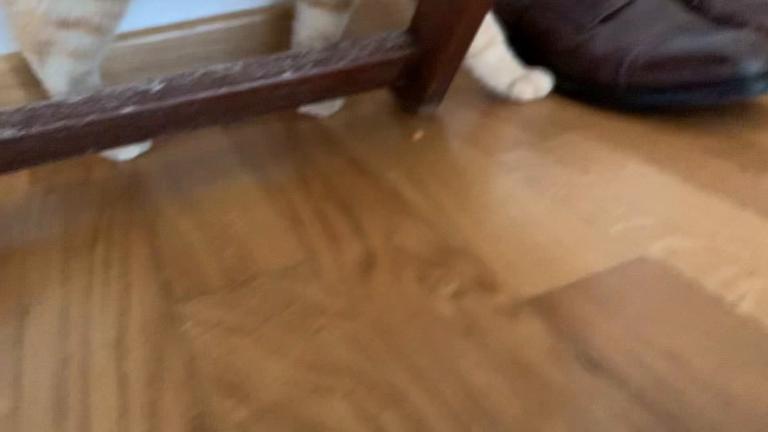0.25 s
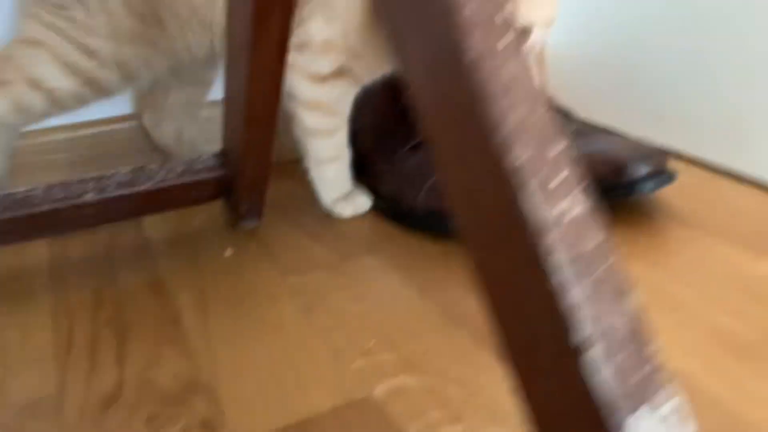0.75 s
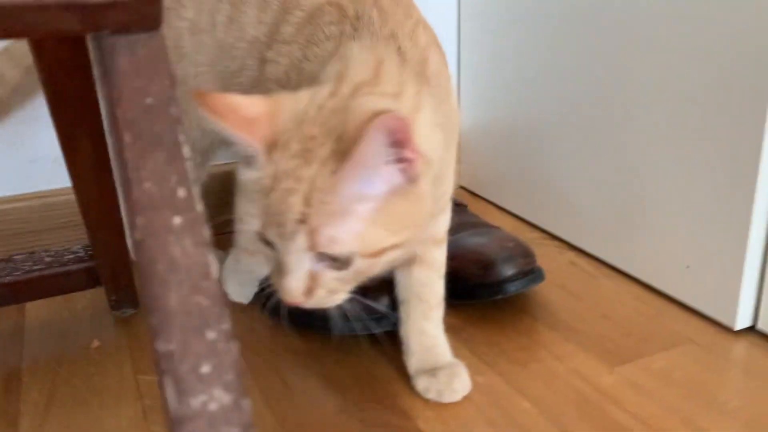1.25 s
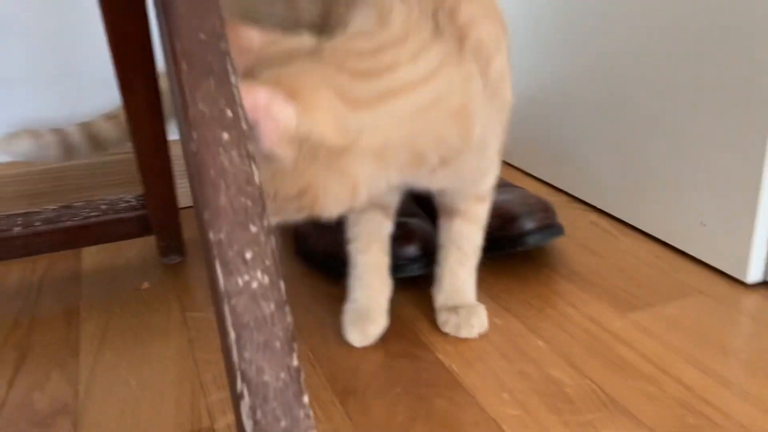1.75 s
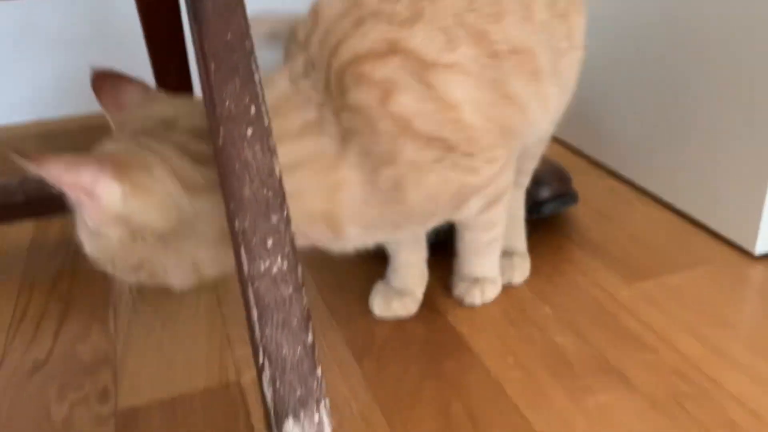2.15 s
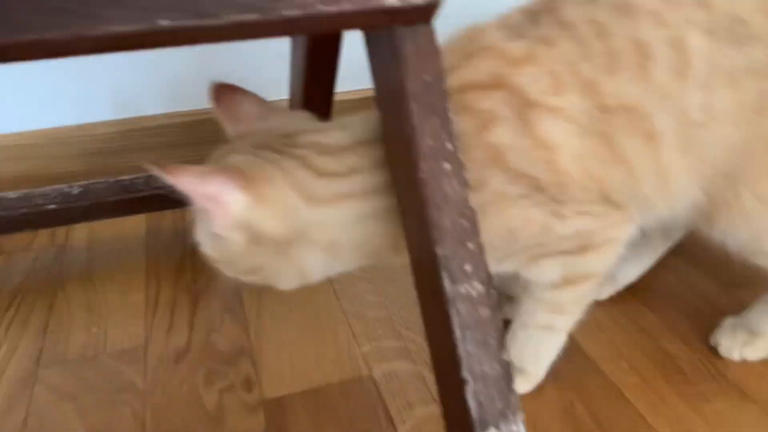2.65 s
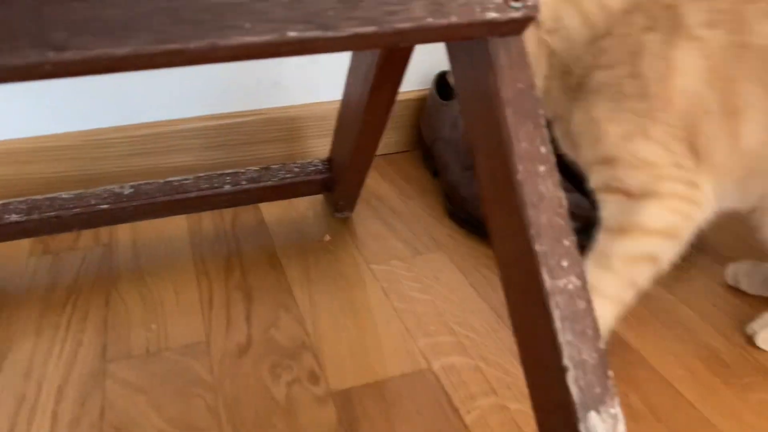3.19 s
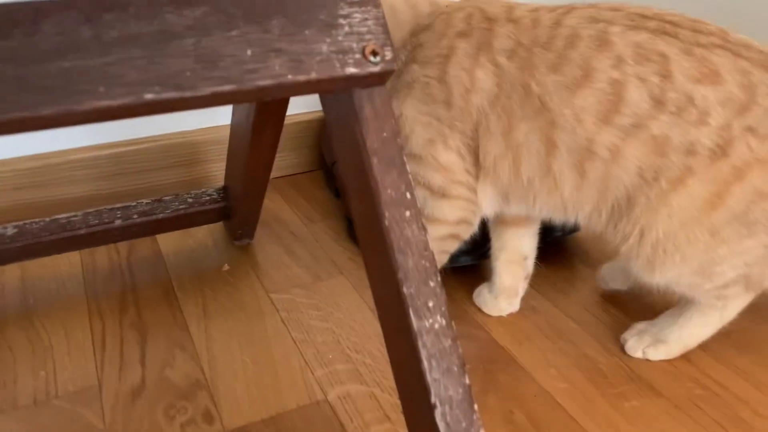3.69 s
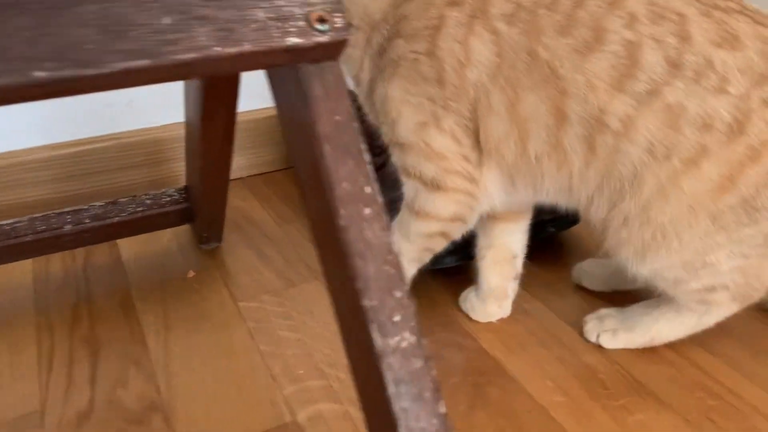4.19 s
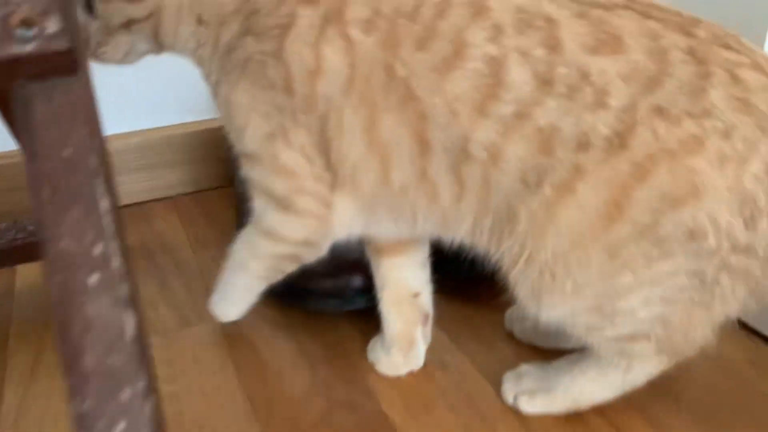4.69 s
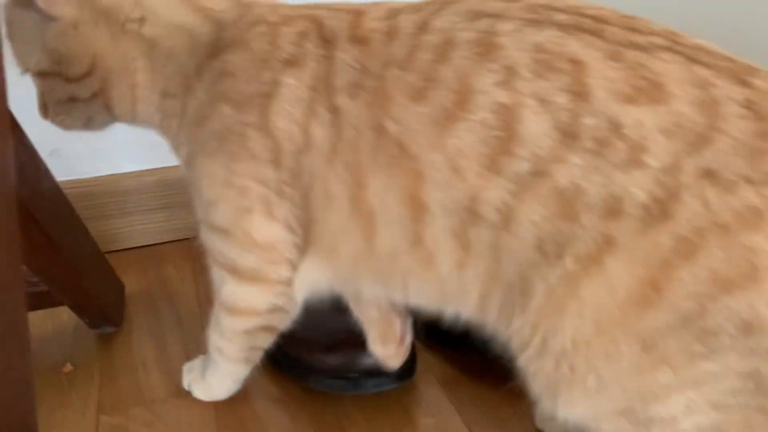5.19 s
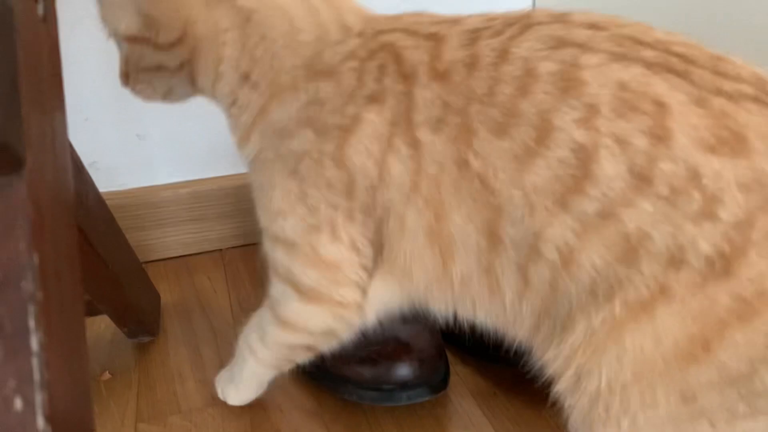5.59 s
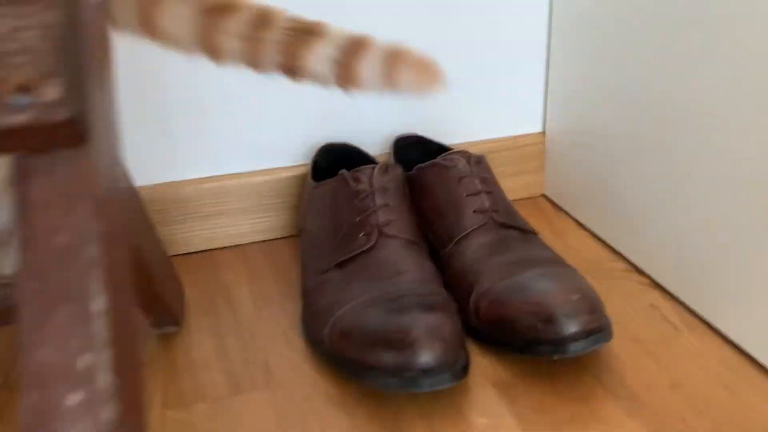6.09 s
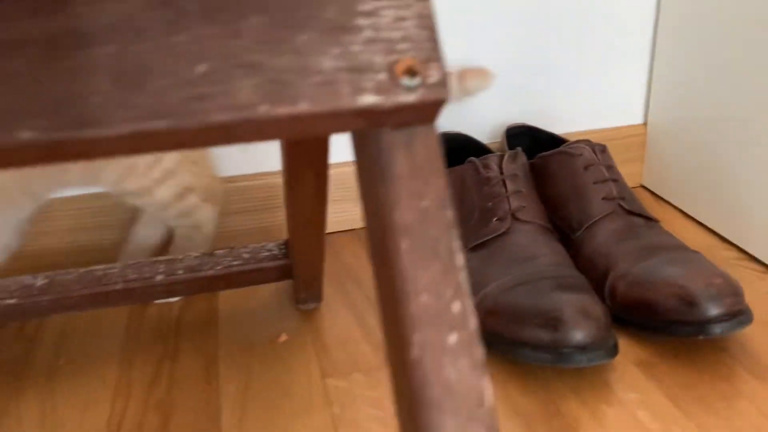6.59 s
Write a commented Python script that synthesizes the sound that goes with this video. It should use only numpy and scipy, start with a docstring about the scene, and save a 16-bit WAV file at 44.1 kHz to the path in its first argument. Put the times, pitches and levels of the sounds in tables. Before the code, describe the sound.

Continuous throaty purring, slightly uneven, rolls over a faint low room rumble and microphone hiss. Fur or cloth brushes in soft, airy strokes, then the purr is left mostly alone. Late on, a sudden woody bang with dry chattering, a few more clicks and dull paw thumps ring briefly in a small, hard indoor space, recorded close in stereo.

```python
"""A cat purrs on a wooden floor, breath after breath: each pulse rings throat and windpipe and swings the chest.
The cat jumps off late in the scene: a stool is knocked, clicks and chatters; paws thud; a small hard room answers.
Knocks are decaying modes with noise cracks. Cloth and fur rustle in strokes of shaped noise.
Behind lie the house's noise rumble and wavering hum, and microphone hiss."""
import sys
import numpy as np
from scipy import signal
from scipy.fft import rfft, irfft, next_fast_len
from scipy.io import wavfile
from scipy.ndimage import uniform_filter1d, map_coordinates

SR = 44100
rng = np.random.default_rng(int(sys.argv[2]) if len(sys.argv) > 2 else 0)


def master_out(mix):
    """Clip the mix to full scale and print it as 16-bit PCM to the path in sys.argv[1]."""
    frames = np.transpose(np.atleast_2d(mix))
    ceiling = np.clip(frames, -1, 1)
    pcm = np.round(ceiling * 32767).astype(np.int16)
    wavfile.write(sys.argv[1], SR, pcm)


N = 302085

# left-right likeness of diffuse sound: freq_hz, correlation
ALIKE = [(60, 0.89), (300, 1), (640, 0.4), (1400, 0.1), (3000, 0.055)]
# modes of the stool ringing freely: freq_hz, level_db, t60_s
STOOL = [(709, -4, 0.11), (813, -11.5, 0.21), (901, -5, 0.14), (1012, -6, 0.11), (1233, -7.5, 0.11),
         (1414, 4, 0.096), (1700, -4, 0.068), (1986, -1, 0.22), (2300, -4, 0.09), (2770, -2, 0.09),
         (3081, -1, 0.09), (3835, -6, 0.07) ]


def amp(db):
    """Gain of a dB value."""
    return 10 ** (np.asarray(db) / 20)


def unit(x):
    """x at rms 1."""
    return x / np.sqrt(np.mean(x ** 2) + 1e-20)


def along(points, hz):
    """(Hz, value) points read at hz on a log axis."""
    f, v = np.transpose(points)
    return np.interp(np.log(hz + 1), np.log(f + 1), v)


def curves(rows, s=np.arange(N) / SR):
    """Each column after the time, read at the times s."""
    t, *cols = np.transpose(rows)
    return [np.interp(s, t, c) for c in cols]


def wobble(rate):
    """A smooth random curve, rate knots a second."""
    knots = rng.standard_normal(int(N * rate / SR) + 4)
    return map_coordinates(knots, [np.arange(N) * rate / SR])


def filtered(x, response):
    """x times a complex response of frequency."""
    m = next_fast_len(N + SR // 2)
    return irfft(rfft(x, m) * response(np.fft.rfftfreq(m, 1 / SR)), m)[..., :N]


def band(x, lo_hz, hi_hz):
    """x through a gentle causal band-pass."""
    return signal.sosfilt(signal.butter(2, [lo_hz, hi_hz], "bandpass", fs=SR, output="sos"), x)


def rush(spectrum, patchy_db):
    """Stereo noise of rms 1 with patches of random gain, alike in the bass and unrelated in the treble."""
    z = signal.stft(rng.standard_normal((2, N)), nperseg=512)[2]
    field = uniform_filter1d(rng.standard_normal(z.shape[1:]), 7, 0)
    field = uniform_filter1d(field, 12, 1)
    pair = signal.istft(z * amp(patchy_db * unit(field)), nperseg=512)[1][:, :N]

    def mid_side_response(hz):
        turn = np.arccos(np.clip(along(ALIKE, hz), -1, 1)) / 2
        return amp(along(spectrum, hz)) * [np.cos(turn), np.sin(turn)]

    mid, side = filtered(pair, mid_side_response)
    return unit(np.array([mid + side, mid - side]))


def add(track, s, sound):
    """Mixes a sound into a track at s seconds."""
    part = track[..., round(s * SR):round(s * SR) + sound.shape[-1]]
    part += sound[..., :part.shape[-1]]


def room(x):
    """A stereo tail of noise in which each frequency dies at its own speed."""
    # reverberation: freq_hz, t60_s
    decay_points = [(100, 0.58), (500, 0.34), (2000, 0.31), (6000, 0.36), (12000, 0.21)]
    hz, t, z = signal.stft(rng.standard_normal((2, SR // 2)), SR, nperseg=256)
    alike = along(ALIKE, hz)[:, None]
    z[1] = alike * z[0] + np.sqrt(np.abs(1 - alike ** 2)) * z[1]
    decay = amp(-60 * t / along(decay_points, hz)[:, None])
    tail = signal.istft(z * decay, SR, nperseg=256)[1]
    delayed = np.pad(x, (250, 0))[None]  # samples before the tail
    return signal.fftconvolve(delayed, tail / np.linalg.norm(tail[0]), axes=1)


def house():
    """A deep rumble and a boom that swell unevenly, a wavering hum, and the microphone's hiss."""
    # rumble: time_s, deep_db, boom_db
    rumble_levels = [(0, -82, -54.5), (.61, -70, -49.5), (.9, -62.5, -53), (1.68, -59, -53),
                     (3.83, -60, -56), (4.41, -53.5, -58), (5.09, -56.5, -61.5), (5.42, -52, -58),
                     (5.65, -61.5, -64.5), (6.85, -69, -47.5)]
    # hum: time_s, pitch_hz, level_db
    hum_track = [(1.2, 78, -60.5), (1.5, 78.1, -53.5), (2.7, 80.2, -53), (3.1, 74.65, -62.5),
                 (3.6, 63.18, -64), (4.1, 59.1, -54), (4.6, 57.5, -66)]
    # noise spectra: freq_hz, relative_db_per_hz
    deep_spectrum = [(13, -33), (22, -10), (48, -13), (59, -17.5), (71, -0.5), (130, -4.5), (170, -94),
                     (290, -120)]
    boom_spectrum = [(70, -4.5), (110, 6.5), (180, -3.5), (250, 3.5), (290, -17.5), (500, -16.5),
                     (900, -46.5)]
    hiss_spectrum = [(500, -7.5), (1000, 0), (1700, -8.5), (3000, -10), (6500, -17.5), (8600, -4),
                     (10500, -12.5), (13500, -13.5), (14200, -54), (15500, -33)]
    deep_db, boom_db = curves(rumble_levels)
    hum_hz, hum_db = curves(hum_track)
    hum_gain = np.sqrt(2) * amp(hum_db + 0.75 * wobble(8.2))
    hum = hum_gain * np.sin(2 * np.pi * np.cumsum(hum_hz + 1.74 * wobble(8.7)) / SR)
    rumble = amp(deep_db) * rush(deep_spectrum, patchy_db=1.2)
    rumble += amp(boom_db) * rush(boom_spectrum, patchy_db=2.5)
    rumble += hum
    rumble[1] = np.roll(rumble[1], round(0.00033 * SR))  # it reaches the left port first
    return rumble + amp(-79.5) * rush(hiss_spectrum, patchy_db=3.5)


def rustle():
    """Cloth and fur slide in strokes: a patchy rush with a slight scratch, a bright sheen and a hollow scrape."""
    # strokes: start_s, end_s, swell_db up to the end (before growth), then cloth_db, sheen_db, scrape_db at the end
    strokes = [(0, 0.252, 11.5, -60.5, -55, -101), (0.23, 1.068, -13, -79, -99, -85),
               (1.18, 1.51, 6, -66, -55, -73), (1.527, 1.763, 6, -64.5, -68.5, -72.5),
               (1.713, 2.155, 10.5, -59, -49.5, -54), (2.202, 2.474, 6, -60.5, -52.5, -60),
               (2.57, 2.768, 5, -69.5, -72.5, -74.5), (2.738, 2.95, -10, -69.5, -69.5, -75.5),
               (2.936, 3.15, -6.5, -83, -56, -86), (3.14, 3.305, 1, -60.5, -57, -64.5),
               (3.336, 3.757, -3, -69.5, -60.5, -91), (3.868, 3.97, 2, -71, -69, -77),
               (5.756, 5.826, -12, -72, -71.5, -94)]
    # exponents of cloth, sheen and scrape on the pressure of a stroke
    growth = [0.7, 1.08, 1.33]
    # noise spectra: freq_hz, relative_db_per_hz
    cloth_spectrum = [(530, -8), (900, -7), (1230, -6.5), (1480, -10.5), (2170, -3.5), (2900, -2),
                      (5210, -2.5), (7500, -8), (9750, -31), (16500, -120)]
    sheen_spectrum = [(5500, -8.5), (7500, -7), (8600, 3.5), (10500, -4.5), (13400, 0.5), (14200, -11.5),
                      (15800, -3.5)]
    scrape_spectrum = [(1100, -13), (1500, -7), (1700, -9.5), (1900, -8), (2120, -11), (2350, -9.5),
                       (3100, -26.5)]
    rise_s, fall_db_per_s = 0.077, 144  # of the pressure, before growth
    rest_db = -86.5  # cloth that barely stirs between strokes

    start, end, swell_db, *levels = np.transpose(strokes)[..., None]
    t = np.arange(0, N / SR + .01, .005)
    pressure_db = swell_db * (np.clip((t - start) / (end - start), 0, 1) - 1)
    pressure_db = pressure_db - fall_db_per_s * np.maximum(t - end, 0)
    pressure = amp(pressure_db) * np.clip((t - start) / rise_s, 0, 1)

    def envelope(end_db, exponent):
        moving = np.linalg.norm(amp(end_db) * pressure ** exponent, axis=0)
        return np.interp(np.arange(N) / SR, t, np.hypot(moving, amp(rest_db)))

    cloth, sheen, scrape = [envelope(db, k) for db, k in zip(levels, growth)]
    layers = cloth * rush(cloth_spectrum, patchy_db=2)
    layers += sheen * rush(sheen_spectrum, patchy_db=2.5)
    layers += scrape * rush(scrape_spectrum, patchy_db=2.2)
    return amp(1.1 * wobble(70)) * layers  # scratch


def scuffle():
    """Short spells of tiny uneven contacts that ring the stool's modes briefly, each in its own mix and tuning."""
    # spells of contacts: start_s, end_s, start_db, fade_db
    scuffles = [(5.998, 6.007, -60, -18), (6.015, 6.201, -43.5, 19.5), (6.211, 6.294, -60, 9.5),
                (6.362, 6.47, -58.5, 13.5), (6.677, 6.706, -66.5, 3.5), (6.717, 6.751, -64.5, 25),
                (6.79, 6.829, -77, 1)]
    contacts_per_s = 700
    spread_db = 2.5  # times minus the log of a uniform draw
    tilt_db_per_octave = 2.5  # light contacts favour the upper modes

    dry, t = np.zeros((2, N)), np.arange(SR // 16) / SR
    hz, level_db, t60 = np.transpose(STOOL)[..., None]
    decay = amp(level_db + tilt_db_per_octave * np.log2(hz / 2000) - 60 * t / (0.25 * t60))
    for start, end, db, fade_db in scuffles:
        contacts = round(contacts_per_s * (end - start)) + 1
        for u, size in rng.uniform(size=(contacts, 2)):
            size_db = db - fade_db * u - spread_db * np.log(size + .05)
            tune = 1 + .017 * rng.standard_normal(hz.shape)  # detuned by the load
            mix = rng.uniform(-0.94, 1, (2, len(STOOL)))
            modes = decay * np.sin(2 * np.pi * hz * tune * t)
            add(dry, start + u * (end - start), amp(size_db) * mix @ modes)
    return dry + amp(-9.5) * room(dry[0])[:, :N]


def knocks():
    """Clicks crack, clatter and ring the stool; knocks ring pairs of close modes, from low thumps to high ticks."""
    # clicks: time_s, wood_db, crack_db, room_db (against the click)
    clicks = [(6.011, -21, -30.5, -7.5), (6.037, -30, -27.5, -2), (6.2344, -46, -55, -2.5),
              (6.2553, -47, -63.5, -0.5), (6.35, -36, -23, -13.5), (6.539, -49.5, -45, -3),
              (6.681, -53, -55.5, -8), (6.8209, -62, -47, -5), (6.8333, -72, -42, -2)]
    # knocks of paws and stool legs, plus one strong throat ring at 6.231 s, lower mode of each pair: time_s,
    # level_db, pitch_hz, t60_s
    mode_pairs = [(2.145, -25.5, 380, 0.022), (4.8, -33, 160, 0.086), (6.012, -14.5, 169, 0.034),
                  (6.016, -25, 309, 0.12), (6.015, -25.5, 101.3, 0.13), (6.231, -36.5, 525, 0.039),
                  (6.16, -28.5, 189, 0.053), (6.351, -36, 1028, 0.076), (6.652, -25, 132, 0.073),
                  (8.3, -47.5, 742, 0.16), (6.353, -44, 2900, 0.042), (6.822, -54, 2610, 0.028)]

    out, t = np.zeros((2, N)), np.arange(SR // 4) / SR
    late_s = np.array([[0], [.00012]])  # the right channel hears it slightly later
    for s, db, crack_db, room_db in clicks:
        free = np.clip(1 + (db + 20) / 40, .4, 1)  # light taps leave the legs down, and damped
        ring = np.zeros((2, len(t)))
        for hz, level_db, t60 in STOOL:
            decay = amp(level_db + rng.normal(0, 2.2) - 60 * t / (free * t60))
            ring += decay * np.sin(2 * np.pi * (hz * (t - late_s) + rng.uniform()))
        noise = rng.standard_normal((2, 2, len(t)))
        crack = band(noise[0], lo_hz=4200, hi_hz=14800) * amp(crack_db - db - 60 * t / 0.036)
        crack *= 1 - np.exp(-t / 0.001)
        # many small modes, too dense to count
        clatter = band(noise[1], lo_hz=490, hi_hz=2861) * amp(4.5 - 60 * t / 0.05)
        rise = 1 - np.exp(-t / 0.0012)  # wood yields before it rings
        direct = (amp(-13.0) * ring + clatter) * rise + crack
        to_room = (amp(-17) * ring + clatter) * rise + crack
        add(out, s - .0015, amp(db) * direct * amp([[-.7], [.7]]))
        add(out, s - .0015, amp(db + room_db) * room(to_room[0]))
    for s, db, hz, t60 in mode_pairs:
        pair = np.sin(2 * np.pi * hz * t) + amp(-13.5) * np.sin(2 * np.pi * 1.1 * hz * t)
        rise = 1 - np.exp(-t * hz / 0.87)  # it builds over about a cycle
        knock = amp(db - 60 * t / t60) * rise * pair
        add(out, s, np.array([knock, np.roll(knock, 15)]))
        add(out, s, amp(-8) * room(knock))
    return out


def purr():
    """Each snap of the vocal folds rings the throat at once and swings the chest a moment later."""
    # breaths: first_pulse_s, last_pulse_s, pulses, middle_late_ms, chest_db, throat_db, swell_db over the breath
    breaths = [(0.323, 0.704, 11, 4.5, -34.5, -44, -2), (0.75, 0.924, 6, -7, -51.5, -77, -1),
               (0.984, 1.087, 4, 2, -48, -44, -5), (1.231, 1.695, 13, 2, -37.5, -47.5, -2),
               (1.847, 2.108, 8, -1, -49, -43, -1), (2.177, 2.62, 12, 3.5, -42.5, -41, 0.5),
               (2.725, 3.015, 9, -1, -50, -36, 6.5), (3.093, 3.593, 13, 1.5, -43, -45.5, -7.5),
               (3.67, 4.057, 11, 6, -49.5, -58, 4), (4.141, 4.258, 4, -5.5, -43, -48, -5),
               (4.309, 4.653, 10, 1.5, -41, -46, 0), (4.729, 5.111, 11, -3, -50.5, -65, -7),
               (5.226, 5.597, 10, 2, -42, -49, 1.5), (6.083, 6.242, 5, 3.5, -42, -46, 21),
               (6.278, 6.602, 10, -1, -50, -47.5, 14), (6.683, 6.805, 4, -1.5, -43.5, -45.5, -4)]
    # the cat stoops, turns and walks off: time_s, throat_hz, chest_hz, windpipe_db (against the throat)
    pose = [(.15, 480, 150, -13.5), (.5, 613, 154, 3), (1.04, 363, 157, -1), (1.46, 593, 164, 6.5),
            (2.4, 631, 128.6, -6), (2.9, 598, 167, -6.5), (3.6, 654, 142, -7.5), (5.4, 584, 137, -16),
            (6.2, 544, 161, -1.5)]
    chest_swell_share = 0.21  # of the throat's swell

    out, t = np.zeros((2, N)), np.arange(SR // 12) / SR
    for first, last, pulses, late_ms, chest_mid_db, throat_mid_db, swell_db in breaths:
        throat_hz, chest_hz, pipe_db = curves(pose, (first + last) / 2)
        breath = np.zeros(SR)
        uneven_db = np.clip(.4 * (-46 - throat_mid_db), 1.5, 5)  # faint breaths snap unevenly
        right_late_ms = .1 if first < 1.2 else .4  # the left port leads by more once the cat has turned
        for u in np.linspace(0, 1, round(pulses)):
            s = (last - first) * u + 4 * u * (1 - u) * late_ms / 1000
            fade_db = -4 * (2 * u - 1) ** 6  # the air flow is weak where the breath turns
            jitter, size, size2, tune, tune2, again, wait = rng.standard_normal(7)
            chest_db = chest_mid_db + chest_swell_share * swell_db * (u - .5) + fade_db + 1.3 * size2
            throat_db = throat_mid_db + swell_db * (u - .5) + fade_db + uneven_db * size
            ring = np.sin(2 * np.pi * throat_hz * (1 + .045 * tune) * t)
            ring *= amp(-60 * t / 0.026) * (1 - np.exp(-t / 0.000077))
            # the folds part again with a weaker, uneven snap
            ring += amp(-11 + 4 * again) * np.roll(ring, round((.0075 + .0015 * wait) * SR))
            # the windpipe's low mode
            snap = np.sin(2 * np.pi * 370 * t) * amp(-60 * t / 0.015) * (1 - np.exp(-t / 0.00013))
            swing = -np.sin(2 * np.pi * chest_hz * (1 + .04 * tune2) * t)
            swing *= (t / 0.006 * np.exp(1 - t / 0.0064)) ** 4.07
            pulse = amp(throat_db) * (ring + amp(pipe_db) * snap) + amp(chest_db) * swing
            add(breath, abs(s + 0.00043 * jitter), pulse)
        # a low throat muffles the snap
        breath = filtered(breath, lambda hz: 1 / (1 + (hz / (1.71 * throat_hz)) ** 8))[:SR]
        right = np.roll(breath, round(right_late_ms * SR / 1000))
        direct = np.array([amp(1.07) * breath, amp(1.83) * right])
        add(out, first - .0015, direct + amp(-10.5) * room(breath)[:, :SR])
    # flesh passes nothing bright, a small body nothing deep
    return filtered(out, lambda hz: 1 / (1 + (hz / 860) ** 8) / (1 + (65 / (hz + 1)) ** 4))


def scene():
    """All sources in stereo."""
    return house() + rustle() + scuffle() + knocks() + purr()


def record(dry):
    """Above about 7 kHz the right channel is the left, phase-shifted by frequency; then colour and band limit."""
    # phase of right against left: freq_hz, turn_cycles
    turns = [(7200, .25), (8100, .5), (9300, .5), (10400, 1), (11600, 1), (12700, 1.5), (14200, 1.5),
             (15000, 2)]
    # microphone response: freq_hz, gain_db
    mic = [(20, -21.5), (45, -1.5), (13800, -0.5), (14300, -4.5), (15600, -2.5), (16100, -33)]
    top_hz = 16800

    def left_share(hz):
        return np.clip((hz - 6300) / 1800, 0, 1)

    own = filtered(dry[1], lambda hz: np.sqrt(1 - left_share(hz) ** 2))
    from_left = filtered(dry[0], lambda hz: left_share(hz) * np.exp(2j * np.pi * along(turns, hz)))
    stereo = np.array([dry[0], own + from_left])
    return filtered(stereo, lambda hz: amp(along(mic, hz)) * (hz < top_hz))


dry = scene()
out = record(dry)
master_out(out)
```